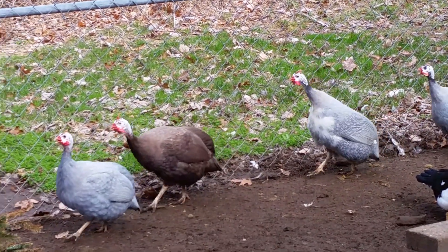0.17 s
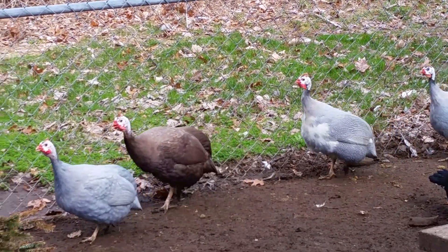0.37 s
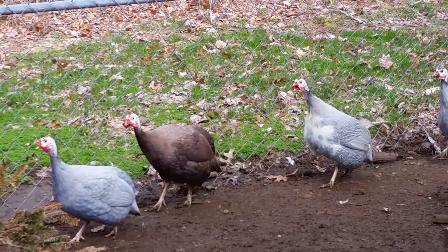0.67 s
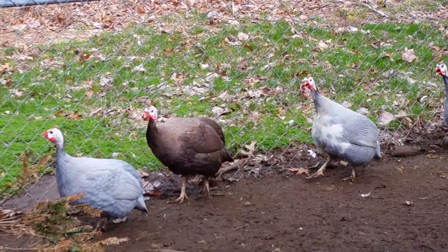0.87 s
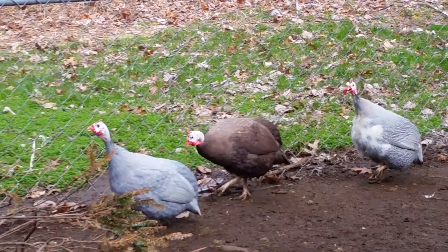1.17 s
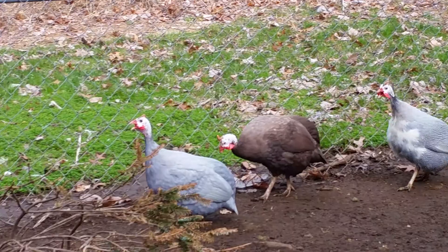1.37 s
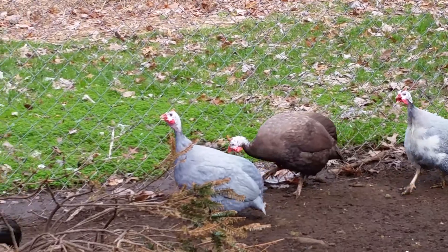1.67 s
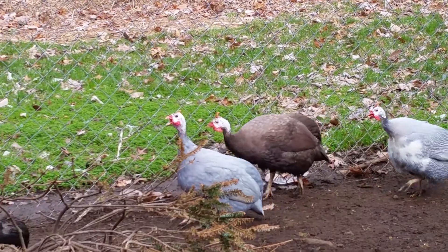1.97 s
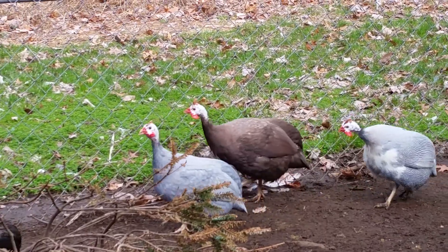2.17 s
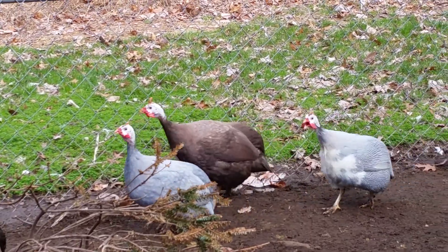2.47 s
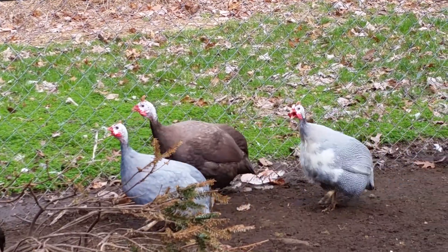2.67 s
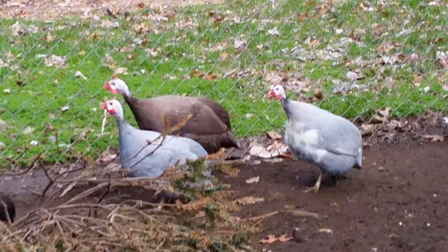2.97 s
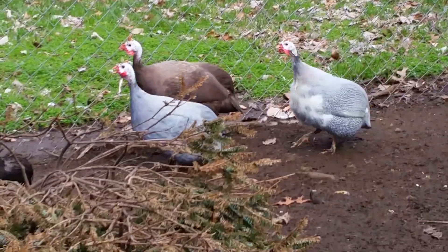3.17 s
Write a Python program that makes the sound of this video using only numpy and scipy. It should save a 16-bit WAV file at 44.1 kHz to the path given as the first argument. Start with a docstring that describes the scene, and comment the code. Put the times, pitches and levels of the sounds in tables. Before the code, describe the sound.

Guinea fowl flock squawking harshly, with rasping calls, throbbing trills and quick chatters outdoors

```python
"""Open ground by a fence, a flock of guinea fowl a few metres from a small two-port recorder.
Rasps and a run of short chatters are uneven syrinx pulses and air puffs ringing in a windpipe.
Throbbing trills are stacked overtones; peeps are near-pure whistles, chirps hoarse sliding ones.
Fence and ground give a short echo, as decaying noise; shaped noise makes a low wind rumble behind,
its level rising and falling along a set curve."""
import sys
import numpy as np
from scipy import signal
from scipy.fft import rfft, irfft, next_fast_len
from scipy.io import wavfile
from scipy.ndimage import map_coordinates

SR = 44100
rng = np.random.default_rng(int(sys.argv[2]) if len(sys.argv) > 2 else 0)


def ratio(d):
    """dB to gain"""
    e = np.asarray(d, float) / 20
    return 10 ** e


def waveform_to_disk(signal):
    """Save audio, clipped to [-1, 1], as 16-bit WAV at the path in sys.argv[1]."""
    frames = np.transpose(np.atleast_2d(signal))
    scaled = np.clip(frames, -1, 1) * 32767
    samples = np.round(scaled).astype(np.int16)
    wavfile.write(sys.argv[1], SR, samples)


N = 145971  # samples

ATTACK_S, RELEASE_S = 0.0046, 0.021  # rasps, chatters and trills
WHISTLE_EDGE_S = 0.0023  # attack and release of peeps and chirps


def unit(x):
    """Scale to rms 1."""
    return x / np.sqrt(np.mean(x ** 2) + 1e-18)


def walk(size, rate):
    """Smooth random drift through rate knots a second, spread near 1."""
    knots = rng.standard_normal(int(size * 400 / SR) + 4)
    return map_coordinates(knots, [np.arange(size) * min(rate, 400) / SR + 1], order=3)


def shape(t, length, attack, release):
    """Rounded attack, hold, rounded release."""
    ramp = np.clip(np.minimum(t / attack, (length - t) / release), 0, 1)
    return np.sin(np.pi / 2 * ramp) ** 2


def add(out, start, call):
    """Mix a call into both ports at start s, a little earlier at one of them."""
    lag = .00007 * rng.standard_normal()  # s, drawn anew for every call
    for port, s in zip(out, (start + lag, start - lag)):
        i = int(np.round(s * SR))
        a, b = max(i, 0), min(i + len(call), N)
        port[a:b] += call[a - i:b - i]


def pipe(x, modes):
    """Ring x through steep windpipe resonances (each applied twice); the throat cuts the bass."""
    throat_cut_hz = 980
    size = next_fast_len(len(x))
    hz = np.arange(size // 2 + 1) * SR / size + 1e-9
    gain = 0
    for mode_hz, width_hz, db in modes:
        detune = (hz / mode_hz - mode_hz / hz) * mode_hz
        gain = gain + ratio(db) / (1 + 1j * detune / (1.55 * width_hz)) ** 2
    gain = gain / (1 + (throat_cut_hz / hz) ** 8)
    return irfft(rfft(x, size) * gain, size)[:len(x)]


# ground noise spectrum: frequency_hz, density_db (relative, per Hz)
GROUND_SPECTRUM = [(15, -45), (30, -14), (60, -1.5), (130, -2.5), (280, -3), (520, -10), (850, -14.5),
                   (1600, -11), (3000, -13.5), (5000, -29), (7600, -36), (11000, -31), (15800, -27)]
# rise and fall of the background level: time_s, swell_db (BACKGROUND_DB is added)
BACKGROUND_SWELL = [(0.0, -46.5), (0.41, -45.5), (0.43, -42.5), (1.13, -45.5), (2.1, -39.5), (2.13, -35),
                    (2.15, -41), (2.72, -46.5), (3.16, -41.5), (3.31, -50)]
BACKGROUND_DB, WAVER_DB = 5.5, 0.34
ALIKE_HZ = 970  # below this the two ports grow alike


def outdoors():
    """Wind rumble and far murmur as shaped noise, the bass nearly alike at both ports."""
    hz = np.arange(N // 2 + 1) * SR / N + 1
    curve_hz, curve_db = np.transpose(GROUND_SPECTRUM)
    colour = ratio(np.interp(np.log(hz), np.log(curve_hz), curve_db))
    mid, side = rfft(rng.standard_normal((2, N))) * colour
    wide = np.clip(hz / ALIKE_HZ, .22, 1)
    both = np.array([mid + wide * side, mid - wide * side]) / np.sqrt(1 + wide ** 2)
    swell_db = np.interp(np.arange(N) / SR, *np.transpose(BACKGROUND_SWELL))
    return unit(irfft(both, N)) * ratio(BACKGROUND_DB + swell_db + WAVER_DB * walk(N, 4.18))


PITCH_ARCH, PITCH_WOBBLE, PITCH_DRIFT = .045, .018, .008  # shares of pitch
FLUTTER_DB, HUM_WAVER_DB = 2.5, 1.5
PULSE_SCATTER_DB = 2.2  # uneven pulse size at full roughness
PUFF_CYCLES = .28  # decay of each air puff
VOICE_TOP_HZ = 2600  # clean pulses fade above


def squawk(length, hz, rough, hum_db, modes):
    """Uneven syrinx pulses, each with a puff of air, through the windpipe, over a clean chest hum."""
    t = np.arange(int((length + .03) * SR)) / SR  # room for the pipe to ring on
    rough = np.clip(rough, 0, 1)
    arch = PITCH_ARCH * (np.sin(np.pi * np.clip(t / length, 0, 1)) - .6) * min(length / .4, 1)
    pitch = hz * (1 + arch + PITCH_WOBBLE * walk(len(t), 160) + PITCH_DRIFT * walk(len(t), 14))
    cycles = np.cumsum(pitch) / SR + .5
    turn = np.pi * (cycles % 1) + 1e-9
    # a pulse train with every overtone that fits below the top of the band
    top = 2 * int(.45 * SR / hz / 1.1) + 1
    low_pass = signal.butter(2, VOICE_TOP_HZ, fs=SR, output="sos")
    pulses = signal.sosfilt(low_pass, np.sin(top * turn) / np.sin(turn) - 1)
    puffs = np.exp(-(cycles % 1) / PUFF_CYCLES) * rng.standard_normal(len(t))
    pulse_sizes = ratio(PULSE_SCATTER_DB * rough * rng.standard_normal(400))
    size = pulse_sizes[np.round(cycles).astype(int)]
    drive = size * ((1 - rough ** 2) ** .5 * unit(pulses) + rough * unit(puffs))
    drive = drive * ratio(FLUTTER_DB * walk(len(t), 43.45))
    edge = shape(t, length, ATTACK_S, RELEASE_S)
    hum = ratio(hum_db + HUM_WAVER_DB * walk(len(t), 28)) * np.sin(2 * turn) * edge
    return unit(pipe(drive * edge, modes)) + hum


# windpipe resonances in a rasp: frequency_hz, width_hz (before pipe() widens it), level_db
RASP_PIPE = [(1085, 86, -1.5), (1454, 230, 1), (2050, 133, 1.5), (2600, 740, 2.5), (3245, 133, 5.5),
             (3900, 515, 1), (4550, 690, -7), (5400, 270, -10), (9500, 400, -43), (11000, 2980, -10),
             (13800, 830, -40.5)]
# long rasping calls: start_s, length_s, level_db, pitch_hz, roughness (1 = all air), beak_hz
RASPS = [(-.05, 0.38, -27, 376.5, 0.42, 1714), (0.066, 0.38, -29, 437, 0.77, 2250),
         (0.229, 0.19, -28.5, 401, 0.92, 5400), (0.347, 0.098, -27, 392, 1.1, 4640),
         (.61, 0.31, -26, 370.4, 1, 2570), (0.933, 0.14, -29.5, 381, 0.96, 2770),
         (1.018, .52, -23, 375, 0.77, 1760), (1.099, 0.4, -25, 394.5, .9, 5400),
         (1.397, 0.117, -23.5, 361.6, 1, 1500), (1.568, 0.098, -24, 384.4, 0.77, 1890),
         (1.796, 0.068, -30, 345.5, 0.94, 1740), (1.861, 0.039, -32, 344.3, 0.87, 1900),
         (1.927, 0.11, -35.5, 341, 0.6, 2600), (1.998, .125, -24.5, 340.5, 0.87, 2600),
         (2.137, 0.13, -25.5, 334.7, 0.88, 1830), (2.369, 0.43, -23.5, 385.6, 0.48, 1872),
         (2.792, 0.24, -34, 389, 0.65, 1220), (3.225, 0.21, -25.5, 353.7, 0, 2190)]


def rasps(out):
    """Long squawks; the clearer the voice, the more its beak resonance stands out."""
    for start, length, db, hz, rough, beak_hz in RASPS:
        beak = (beak_hz, 244, 1 + 12 * (1 - rough))  # Hz, width Hz, dB
        add(out, start, ratio(db) * squawk(length, hz, rough, -16.5, RASP_PIPE + [beak]))


SCOOP, SCOOP_S = .25, .006  # a trill opens from below: share of pitch, decay
TRILL_WOBBLE, THROB_BEND = .016, .025  # shares of pitch; each throb sweeps by the second
TRILL_SPREAD_HZ, TRILL_WANDER_HZ = 800, 110  # width and drift of the loudest region
TRILL_DEPTH, TRILL_FLICKER_DB, TRILL_AIR_DB = .68, 4, -9  # depth before squaring
SHRILL_HZ, SHRILL_WIDTH_HZ, SHRILL_DB, SHRILL_RISE_S = 11270, 2460, -17, .04  # top that comes late


def trill(length, hz, peak_hz, rate, scoop):
    """Overtones of a high voice, loudest near the beak resonance, throbbing, with air in each throb."""
    t = np.arange(int(length * SR)) / SR
    pitch = hz * (1 - scoop * np.exp(-t / SCOOP_S) + TRILL_WOBBLE * walk(len(t), 229.3))
    peak = peak_hz * (1 - scoop * np.exp(-t / SCOOP_S / 2)) + TRILL_WANDER_HZ * walk(len(t), 20.7)
    beat = 2 * np.pi * np.cumsum(rate * (1 + .12 * walk(len(t), 30))) / SR
    phase = 2 * np.pi * np.cumsum(pitch) / SR + THROB_BEND * hz / rate * np.sin(beat)

    def throb(lag):
        return (1 - TRILL_DEPTH * (.5 + .5 * np.cos(beat + lag))) ** 2

    voice = 0
    for k in np.arange(3, 23):
        near = 1 / (1 + ((k * hz - peak) / TRILL_SPREAD_HZ) ** 2) ** 2
        shrill = ratio(SHRILL_DB) / (1 + ((k * hz - SHRILL_HZ) / SHRILL_WIDTH_HZ) ** 2) ** 2
        level = near + shrill * np.minimum(t / SHRILL_RISE_S, 1) ** 2
        level = level * throb(1.2 * k) * ratio(TRILL_FLICKER_DB * walk(len(t), 68.3))
        voice = voice + level * np.sin(k * phase + 2 * np.pi * rng.random())
    air = pipe(throb(2.74) * rng.standard_normal(len(t)), [(peak_hz, 2200, 0)])
    return (unit(voice) + ratio(TRILL_AIR_DB) * unit(air)) * shape(t, length, ATTACK_S, RELEASE_S)


# throbbing trills: start_s, length_s, level_db, pitch_hz, loudest_hz, throbs_per_s
TRILLS = [(-.04, 0.11, -26, 656, 4270, 72), (0.058, 0.11, -24.5, 591, 3990, 64),
          (0.103, 0.14, -22, 602, 3360, 65), (.24, 0.21, -37, 645, 3900, 45),
          (0.571, 0.13, -21, 646.6, 3820, 83), (0.686, 0.22, -27, 649.4, 4020, 39),
          (0.932, 0.11, -21.5, 640, 3260, 45.4), (1.039, 0.23, -26.5, 644, 3340, 72),
          (1.29, 0.27, -34, 649, 4000, 80), (1.568, 0.085, -24, 632, 3650, 80),
          (1.755, 0.037, -30, 640, 4020, 97), (1.95, 0.053, -29, 616, 3300, 86),
          (2.013, 0.12, -29, 638, 3520, 57), (2.322, 0.069, -25, 631, 3400, 81),
          (2.527, 0.044, -19, 652, 3350, 83), (2.558, .115, -29, 650, 4550, 60),
          (2.648, 0.187, -26.5, 651.5, 3900, 110), (2.822, 0.12, -28.5, 654, 3930, 82.4),
          (2.971, 0.088, -29, 675, 3430, 108), (3.104, 0.032, -23.5, 651, 2980, 88)]


def trills(out):
    """Trills that scoop up from below, except where one runs on from a trill still sounding."""
    for start, length, db, hz, peak_hz, rate in TRILLS:
        fresh = not any(a < start < a + b for a, b, *_ in TRILLS)
        add(out, start, ratio(db) * trill(length, hz, peak_hz, rate, SCOOP * fresh))


PEEP_ARCH, PEEP_WOBBLE = 0.0074, 0.012  # shares of pitch
PEEP_FLUTTER_DB, PEEP_OCTAVE_DB = 2.9, -27


def peep(length, hz, glide_hz):
    """A near-pure whistle with a faint octave, its pitch arching and gliding."""
    t = np.arange(int(length * SR)) / SR
    arch = PEEP_ARCH * (np.sin(np.pi * (t / length) ** .5) - .5)
    pitch = hz * (1 + arch + PEEP_WOBBLE * walk(len(t), 138)) + glide_hz * (t - length / 2)
    phase = 2 * np.pi * np.cumsum(pitch) / SR
    whistle = unit(np.sin(phase) + ratio(PEEP_OCTAVE_DB) * np.sin(2 * phase))
    flutter = ratio(PEEP_FLUTTER_DB * walk(len(t), 135))
    return whistle * flutter * shape(t, length, WHISTLE_EDGE_S, WHISTLE_EDGE_S)


# whistled peeps: start_s, length_s, level_db, pitch_hz, glide_hz_per_s
PEEPS = [(0.138, 0.068, -29, 1110, -900), (0.42, 0.028, -16.5, 1610, -300), (0.637, 0.092, -42, 1730, -900),
         (0.776, 0.027, -22, 1550, -300), (0.804, 0.048, -34, 1080, -300), (0.844, 0.023, -23.5, 1670, -5),
         (0.978, 0.035, -30.5, 1630, 0), (1.2, 0.092, -28.5, 2050, -1200), (1.842, .03, -56, 6100, -2400),
         (1.993, 0.023, -43, 6000, 1200), (2.026, 0.06, -35, 1080, -300), (2.165, 0.039, -25, 4550, 1500),
         (2.896, 0.058, -24.5, 1620, -200), (2.992, 0.07, -31.5, 1100, -1200),
         (3.003, 0.06, -16, 2200, -2400)]


def peeps(out):
    """Short whistles, each gliding at its own set speed."""
    for start, length, db, hz, glide_hz in PEEPS:
        add(out, start, ratio(db) * peep(length, hz, glide_hz))


CHIRP_JUMP, CHIRP_JUMP_S, CHIRP_FALL_PER_S, CHIRP_WOBBLE = .2, .0035, 4.6, 0.012  # shares of pitch
CHIRP_FLUTTER_DB, CHIRP_AIR_DB, CHIRP_OCTAVE_DB, CHIRP_TWELFTH_DB = 3, -8, -28, -11.5


def chirp(length, hz):
    """A hoarse whistle with air from the windpipe: quick jump up, then a slide down."""
    t = np.arange(int(length * SR)) / SR
    glide = -CHIRP_JUMP * np.exp(-t / CHIRP_JUMP_S) - CHIRP_FALL_PER_S * t
    pitch = hz * (1 + glide + CHIRP_WOBBLE * walk(len(t), 370))
    phase = 2 * np.pi * np.cumsum(pitch) / SR
    whistle = np.sin(phase) + ratio(CHIRP_OCTAVE_DB) * np.sin(2 * phase)
    whistle = whistle + ratio(CHIRP_TWELFTH_DB) * np.sin(3 * phase)
    air = pipe(rng.standard_normal(len(t)), RASP_PIPE)
    hoarse = unit(whistle) + ratio(CHIRP_AIR_DB) * unit(air)
    flutter = ratio(CHIRP_FLUTTER_DB * walk(len(t), 220))
    return hoarse * flutter * shape(t, length, WHISTLE_EDGE_S, WHISTLE_EDGE_S)


# rough chirps: start_s, length_s, level_db, top_hz (pitch the jump aims at)
CHIRPS = [(.94, .04, -26.5, 4200), (1.717, 0.031, -27, 4150), (1.724, 0.039, -33, 2900),
          (1.781, 0.031, -25, 3550), (1.798, 0.039, -33.5, 1890), (1.817, 0.033, -26, 4105),
          (1.829, 0.015, -40, 5600), (1.916, 0.035, -24, 4140), (1.927, 0.026, -30, 2830),
          (2.017, 0.026, -25, 4000)]


def chirps(out):
    """Brief hoarse whistles that jump up and slide down."""
    for start, length, db, hz in CHIRPS:
        add(out, start, ratio(db) * chirp(length, hz))


# windpipe resonances in a chatter: frequency_hz, width_hz (before pipe() widens it), level_db
CHATTER_PIPE = [(1310, 480, -6), (2742, 320, 7), (3300, 770, 3), (4000, 730, -18), (5170, 490, 1.5),
                (6340, 440, -39), (8700, 1500, -19), (11010, 1900, 0), (13700, 2900, -11)]
# short chatters of the nearest bird: start_s, length_s, level_db, pitch_hz
CHATTERS = [(2.334, 0.061, -20.5, 369.8), (2.467, 0.057, -20, 372.7), (2.591, 0.055, -24.5, 365.7),
            (2.694, 0.068, -24.5, 360.3), (2.801, 0.058, -22, 361.5), (2.908, 0.061, -22.5, 354.7),
            (3.046, 0.055, -21, 362.8), (3.183, 0.13, -22.5, 365.4)]


def chatters(out):
    """Short, mostly airy squawks with a fixed beak resonance and a stronger chest hum."""
    beak = (2170, 220, 8)  # Hz, width Hz, dB
    for start, length, db, hz in CHATTERS:
        add(out, start, ratio(db) * squawk(length, hz, 0.92, -10.5, CHATTER_PIPE + [beak]))


def flock():
    """All calls at their times, at both ports."""
    out = np.zeros((2, N))
    for calls in (rasps, trills, peeps, chirps, chatters):
        calls(out)
    return out


def echo(birds):
    """Short echo off fence and ground: decaying noise, different at each port."""
    echo_db, t60_s, lag_s = -8.5, 0.15, 0.0027
    t = np.arange(SR // 2) / SR
    tail = rng.standard_normal((2, len(t))) * ratio(-60 * t / t60_s) * (t > lag_s)
    tail = tail * ratio(echo_db) / np.sqrt(np.sum(tail ** 2) / 2)
    return signal.fftconvolve(birds, tail, axes=1)[:, :N]


def scene():
    """Calls, their short echo and the background."""
    birds = flock()
    return birds + echo(birds) + outdoors()


# level between the ports: frequency_hz, left_over_right_db
PORT_LEVEL = [(60, -0.5), (380, -1), (700, 0), (1100, 3), (1600, 7.5), (2200, 3), (3000, 11), (3800, 15),
              (4600, 23.5), (5600, 18.5), (7000, -2), (8500, 14), (11000, -14), (15000, -5)]
# phase between the ports: frequency_hz, left_lead_rad
PORT_PHASE = [(0, 0), (600, 0.5), (1550, -1.0), (1890, -2.8), (3190, 4.3), (3790, 5.7), (4480, 2.0),
              (5250, 4.5), (6370, -2.7), (10100, -12.8), (11700, -5.6), (12200, -3.1), (13500, -4.0),
              (15500, -10.2)]


def ports(dry):
    """The two microphone ports differ in colour and phase, half the difference each; the top is cut."""
    top_hz = 15900
    size = next_fast_len(N + 4096)
    hz = np.arange(size // 2 + 1) * SR / size + 1
    level_hz, level_db = np.transpose(PORT_LEVEL)
    half_db = np.interp(np.log(hz), np.log(level_hz), level_db) / 2
    half = ratio(half_db) * np.exp(.5j * np.interp(hz, *np.transpose(PORT_PHASE)))
    return irfft(rfft(dry, size) * np.array([half, 1 / half]) * (hz < top_hz), size)[:, :N]


def top_cut(x):
    """Nothing passes above the cut-off."""
    return signal.sosfilt(signal.butter(12, 15970, fs=SR, output="sos"), x)


def record(dry):
    """Picks the scene up at the two ports and rounds the loudest peaks."""
    limit = .97
    mix = limit * np.tanh(ports(dry) / limit)
    return top_cut(mix)


dry = scene()
out = record(dry)
waveform_to_disk(out)
```